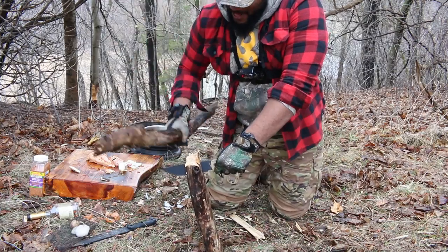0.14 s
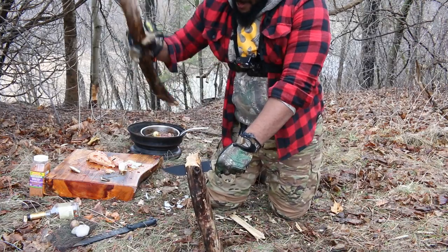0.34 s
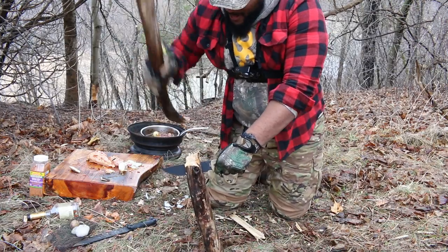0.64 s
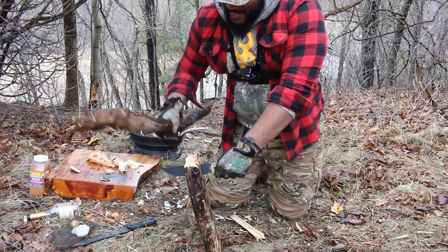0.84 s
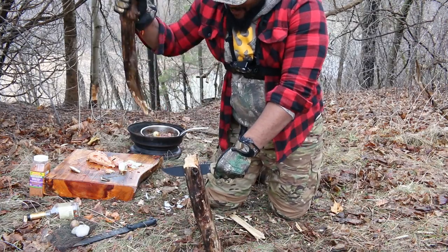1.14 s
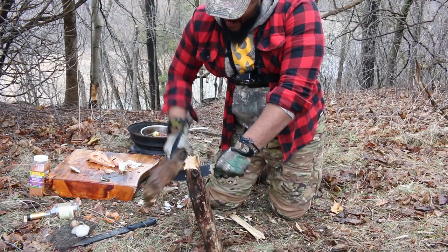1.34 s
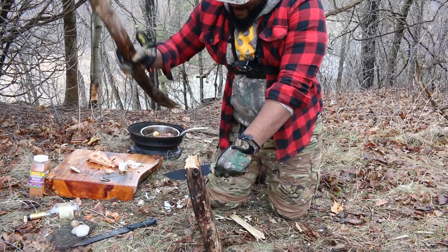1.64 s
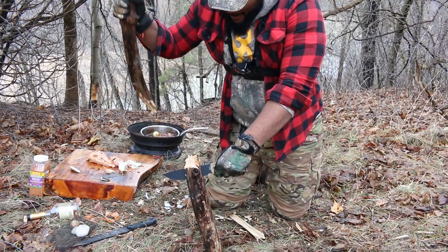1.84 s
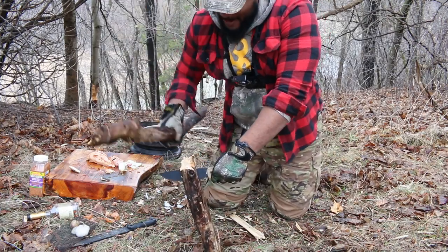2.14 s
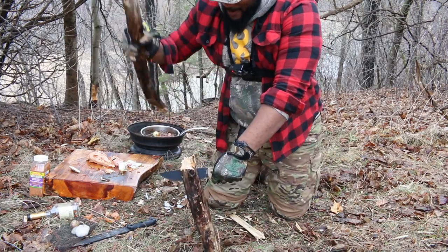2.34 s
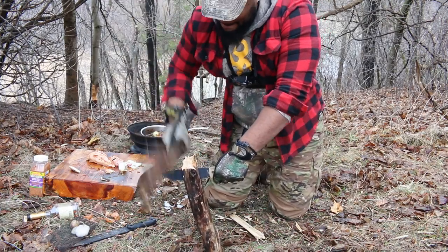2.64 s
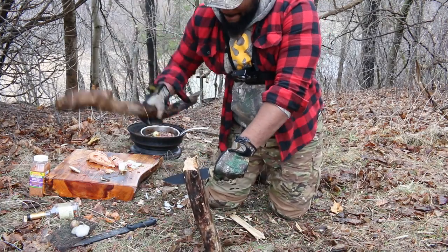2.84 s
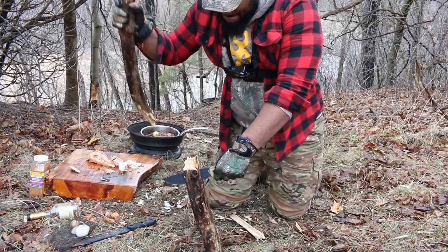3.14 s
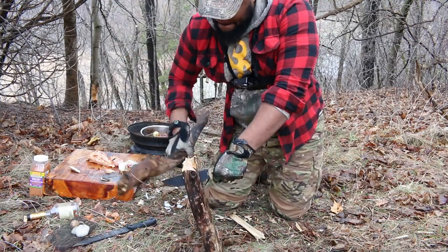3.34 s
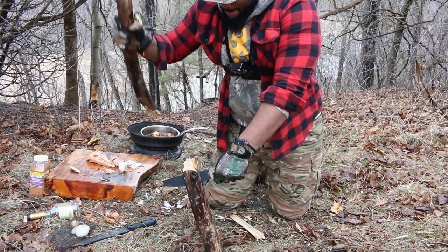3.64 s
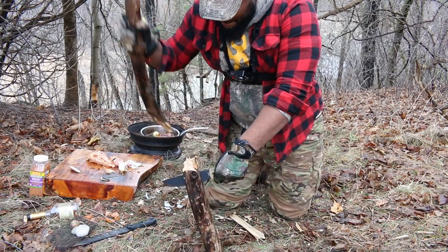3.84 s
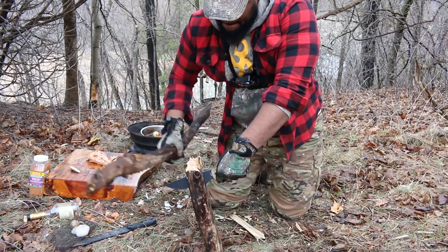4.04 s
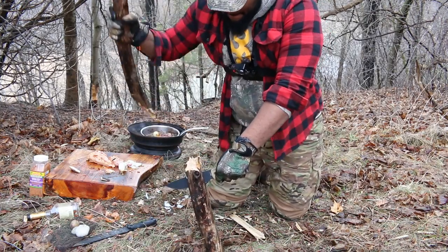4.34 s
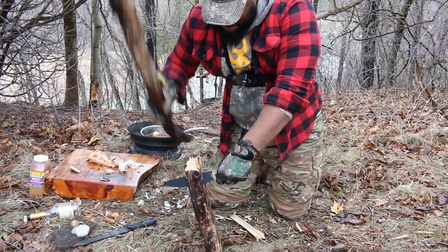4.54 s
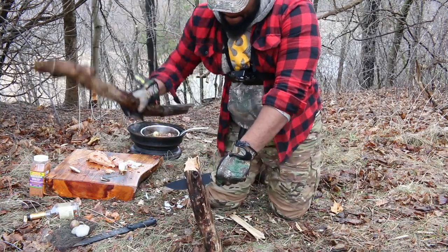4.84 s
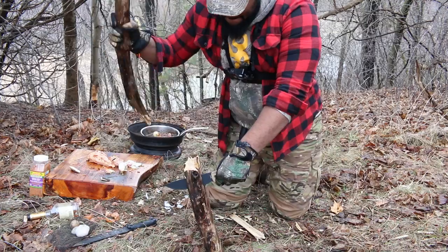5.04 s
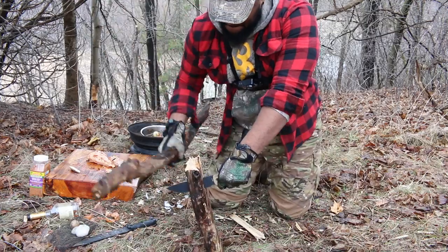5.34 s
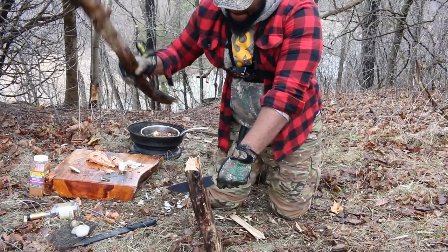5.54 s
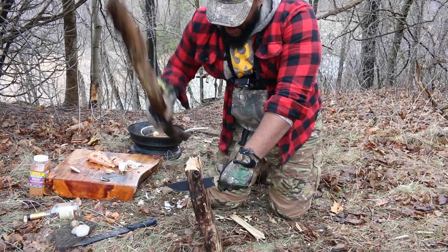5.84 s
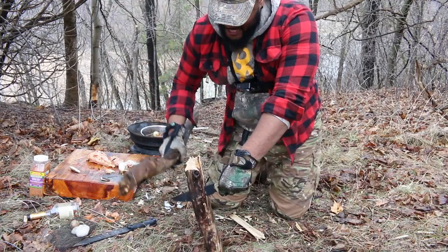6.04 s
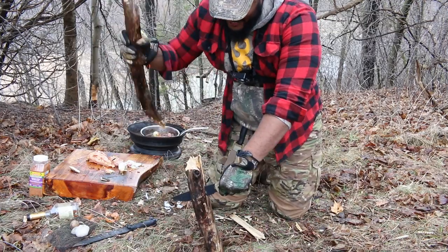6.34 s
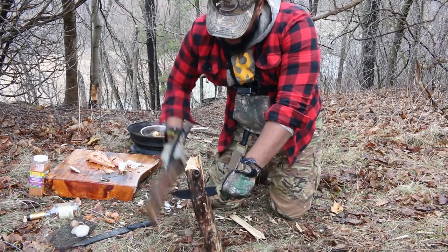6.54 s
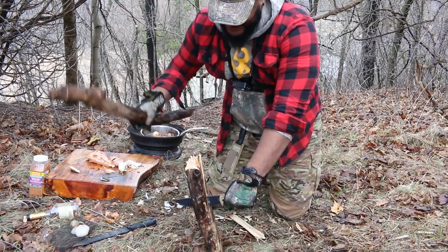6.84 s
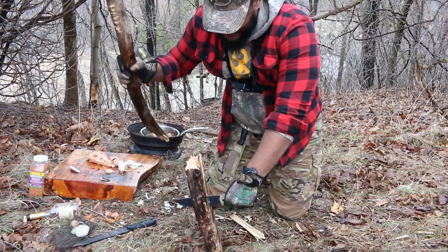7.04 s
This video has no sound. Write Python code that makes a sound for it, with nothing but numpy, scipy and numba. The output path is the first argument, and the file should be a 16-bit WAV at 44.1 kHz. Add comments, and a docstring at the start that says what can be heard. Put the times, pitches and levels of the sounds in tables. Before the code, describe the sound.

A wooden baton knocks hard and steadily on a knife splitting a log, cracking fibres later, over a roaring camp stove and spitting pan.

```python
"""In a bare wood a wooden baton drives a knife down through a log: eleven blows ring a bank of
dying modes, the last five tear fibres in noisy snaps, and trunks and ground echo them sparsely.
A camp stove roars as shaped noise under a pan of spitting fat; a faint hum wavers and light air stirs.
A camera close by clips peaks beyond full scale, and its gain control ducks the background after loud sounds."""
import sys
import numpy as np
from scipy import signal
from scipy.fft import rfft, irfft, next_fast_len
from scipy.io import wavfile
from scipy.ndimage import uniform_filter1d
from numba import njit

SR = 44100
rng = np.random.default_rng(int(sys.argv[2]) if len(sys.argv) > 2 else 0)


def ratio(d):
    """dB to gain"""
    e = np.asarray(d, float) / 20
    return 10 ** e


def master(y):
    """Save y as 16-bit WAV."""
    cut = np.clip(np.atleast_2d(y).T, -1, 1)
    pcm = np.round(cut * 32767)  # scale
    wavfile.write(sys.argv[1], SR, pcm.astype(np.int16))


N = 317079


def evened(x):
    """Scales to rms 1."""
    return x / np.sqrt(np.mean(x ** 2) + 1e-20)


def read(points, hz, column=1):
    """Reads a table column over log frequency."""
    table = np.transpose(points)
    return np.interp(np.log(hz + 1), np.log(table[0] + 1), table[column])


def add(mix, start_s, sound):
    """Mixes a sound in at its start time, cut off at the end of the mix."""
    part = mix[round(start_s * SR):][:len(sound)]
    part += sound[:len(part)]


def ring(t, hz, t60_s):
    """One mode: a sine that falls 60 dB in t60_s."""
    return ratio(-60 * t / t60_s) * np.sin(2 * np.pi * hz * t)


def burst(hz, t60_s, width):
    """A snap: noise that starts at once and dies, in a broad band round hz; peak about 1."""
    t = np.arange(4096) / SR
    noise = rng.standard_normal(len(t))
    band_hz = np.clip([hz / (1 + width), hz * (1 + width)], 100, .45 * SR)
    band = signal.butter(2, band_hz, "bandpass", fs=SR, output="sos")
    steady = signal.sosfilt(band, noise)
    dying = signal.sosfilt(band, noise * ratio(-60 * t / t60_s))
    return dying / (2 * steady.std())


def wander(size):
    """Slow random drift of rms 1, smoothed twice over size samples."""
    once = uniform_filter1d(rng.standard_normal(N), size)
    return evened(uniform_filter1d(once, size))


def ports(x, left_db):
    """A source a little to one side reaches the two microphone ports apart in level and time."""
    lag_samples = 1.86  # the right port hears it later
    size = next_fast_len(N)
    turn = np.exp(-2j * np.pi * np.fft.rfftfreq(size) * lag_samples)
    later = irfft(rfft(x, size) * turn, size)[:N]
    return np.array([x * ratio(left_db / 2), later * ratio(-left_db / 2)])


# baton blows; hardness lifts the modes near the favoured pitch, heft the lowest ones; levels are relative:
# [start_s, strength_db, hardness_db, favoured_hz, heft_db]
BLOWS = [(0.1593, 11.5, 8.5, 2140, 3), (0.8183, 9, -0.5, 2600, 2.5), (1.4580, 7.5, 7, 2800, 3.5),
         (2.1165, 7.5, 7, 3050, 3.5), (2.7662, 8, 8.5, 2900, 4), (3.4086, 9.5, -8.5, 5000, 2.8),
         (4.0626, 14, -10, 2770, 0), (4.7076, 11.5, 0.5, 4300, 1), (5.3645, 8, -1.5, 3300, 0.6),
         (6.0099, 12, -20, 2600, 1.5), (6.6694, 12, 3, 4750, 1.5)]


def blows():
    """Each baton blow sets log, baton and blade ringing afresh."""
    out = np.zeros(N)
    for start_s, *how in BLOWS:
        add(out, start_s, blow(start_s, *how))
    return out


def blow(start_s, strength_db, hardness_db, favoured_hz, heft_db):
    """A short push rings the modes and cracks; a harder contact lifts the favoured modes and the crack."""
    t = np.arange(8192) / SR
    # the log rings shorter once the split opens
    whole_factor, split_opens_s, loss_per_s = 0.94, 3.96, 0.1
    ring_factor = whole_factor - loss_per_s * max(start_s - split_opens_s, 0)
    modes = log_modes(t, hardness_db, favoured_hz, heft_db, ring_factor)
    crack = ratio(-1.0 + 0.27 * hardness_db) * np.pad(burst(3350, 0.022, 0.9), (0, len(t) - 4096))
    contact = 1 - np.exp(-t / 0.00099)  # the force builds while the wood dents
    return ratio(strength_db) * contact * (crack + modes)


# log, baton and blade ring together; levels are relative, decay times are scaled by each excitation:
# [pitch_hz, level_db, t60_s]
LOG = [(59, -33.5, 0.09), (301, -14, 0.019), (547, -10, 0.031), (756, -13, 0.038), (908.5, 0, 0.022),
       (1084.4, 5, 0.026), (1194, -8.5, 0.07), (1302, -5.5, 0.045), (1610, -7.5, 0.029),
       (1993, -9.5, 0.021), (2280, -7.5, 0.02), (2800, -2, 0.014), (3140, -14.5, 0.013), (3320, -24, 0.025),
       (4000, -7.5, 0.004), (4353, -15, 0.018), (4910, -6, 0.016), (5300, -46, 0.0061),
       (6870, -24.5, 0.0033), (7100, -50, 0.0096), (8700, -11, 0.0073)]


def log_modes(t, lift_db, favoured_hz, heft_db, ring_factor):
    """The modes as excited from one spot; neighbours swing in opposite senses."""
    hz, mode_db, t60_s = np.transpose(LOG)[:, :, None]
    chance_db, detune = rng.standard_normal((2, len(LOG), 1))
    near = np.exp(-(np.log2(hz / favoured_hz) / 0.37) ** 2)  # closeness in octaves
    octaves_from_1085 = np.minimum(np.log2(hz / 1085), 0)  # zero above 1085 Hz
    mode_db = mode_db + lift_db * near - heft_db * octaves_from_1085 + 1.6 * chance_db
    sense = (-1.) ** np.arange(len(LOG))[::-1, None]
    modes = ring(t, hz * (1 + 0.018 * detune), t60_s * ring_factor)
    return (sense * ratio(mode_db) * modes).sum(0)


# snaps of tearing fibres; levels are relative: [start_s, level_db, centre_hz]
SPLINTERS = [(4.0585, -11.5, 6000), (4.0614, 5, 7000), (4.7100, 12, 7000), (4.7125, -14, 6000),
             (5.3625, -13, 4400), (5.368, -1, 5500), (5.3709, 13, 4000), (6.014, 4, 6000),
             (6.0218, -6, 4000), (6.024, 6, 3430), (6.03, -9, 3500), (6.6738, 8, 6300), (6.676, 19.5, 4270),
             (6.6881, 13, 2600), (6.6882, 8.5, 5550)]


def splinters():
    """Fibres tear in noisy snaps as the split runs; rows that start together make one snap of two pitches."""
    out = np.zeros(N)
    for start_s, *how in SPLINTERS:
        add(out, start_s, splinter(*how))
    return out


def splinter(level_db, centre_hz):
    """A noisy snap of torn fibre that briefly rings those modes of the log that lie in its band."""
    snap = burst(centre_hz, 0.022, 1.0)
    modes = log_modes(np.arange(4096) / SR, lift_db=45, favoured_hz=centre_hz, heft_db=-3, ring_factor=0.22)
    rung = signal.fftconvolve(snap[:20], modes)[:len(snap)]
    return ratio(level_db) * (snap + 0.53 * rung / abs(rung).max())


def echoes(log):
    """Four random echo patterns take turns from blow to blow, so the tails differ."""
    blow_s = np.transpose(BLOWS)[0]
    pattern = np.searchsorted(blow_s - .1, np.arange(N) / SR) % 4
    rough = roughened(log)
    return sum(trees(rough * (pattern == k)) for k in range(4))


def roughened(x):
    """Blurs the treble peaks with random sign flips, so that the echo tails sound rough, not ringing."""
    split_hz, blur_hz = 1800, 700
    treble = signal.sosfilt(signal.butter(2, split_hz, "highpass", fs=SR, output="sos"), x)
    body = signal.sosfilt(signal.butter(2, split_hz, fs=SR, output="sos"), x)
    blur = signal.sosfilt(signal.butter(2, blur_hz, fs=SR, output="sos"), rng.standard_normal(N))
    return body + treble * np.sign(blur)


# trunks and ground scatter each blow; levels are relative: [band_hz, level_db, t60_s]
TREES = [(100, -51, .25), (400, -68, 0.1), (1234, -20.5, 0.57), (2000, -18.5, 0.31), (2900, -23, 0.43),
         (4160, -19.5, 0.35), (6000, -17.5, 0.24), (12100, -34, 0.51)]


def trees(x):
    """Sparse echoes of random sign, each band with its own level and decay."""
    taps = np.zeros((2, SR // 2))
    slots = np.arange(200, SR // 2 - 20, 20)
    at = slots + rng.integers(0, 20, (2, (SR // 2 - 201) // 20))
    np.put_along_axis(taps, at, rng.choice([-1., 1.], at.shape), 1)
    taps[1] = 0.58 * taps[0] + 0.81 * taps[1]  # the two sides are partly alike
    hz, t, z = signal.stft(taps, SR, nperseg=256)
    t60_s = read(TREES, hz, column=2)[:, None]
    fade = ratio(read(TREES, hz)[:, None] - 60 * t / t60_s) / np.sqrt(150 * t60_s)
    tail = signal.istft(z * fade, SR, nperseg=256)[1]
    return signal.fftconvolve(x[None], tail, axes=1)[:, :N]


def pan():
    """Water bursts out of hot fat: a steady fizz of tiny pops under separate spits."""
    return fizz() + spits()


# bursting bubbles; pitch varies from pop kind to pop kind, levels are relative: [pitch_hz, width_hz, level_db]
FIZZ = [(2600, 840, 3.5), (3670, 720, 6), (4810, 500, 2), (7000, 880, 5.5)]


def fizz():
    """Tiny bubbles pop at random, each a short ring whose bandwidth sets its decay."""
    t, out = np.arange(1024) / SR, np.zeros(N)
    total_db, pops_per_s = -46.5, 350
    kinds = FIZZ * 5
    for hz, width_hz, level_db in kinds:
        size = ratio(2.5 * np.minimum(rng.exponential(1, N), 4))
        pops = size * (rng.random(N) < pops_per_s / SR / len(kinds))
        pop = ratio(level_db) * ring(t, hz * rng.uniform(0.905, 1.107), 3.8 / width_hz)
        out += signal.oaconvolve(pops, pop)[:N]
    return ratio(total_db) * evened(out)


# loud spits of fat; levels are relative: [start_s, level_db, centre_hz]
SPITS = [(.58, -24, 3730), (.6887, -24, 4130), (1.036, -26, 6340), (1.2313, -20, 4570), (1.266, -27, 3670),
         (1.3278, -20, 6150), (1.3477, -22.5, 3750), (1.686, -12, 6500), (1.7804, -22, 3450),
         (1.81, -22, 2410), (2.254, -19, 3830), (2.426, -21.5, 6440), (2.7082, -26, 2790),
         (3.1509, -22.5, 4200), (4.5775, -21.5, 3400), (4.6293, -16, 1890), (4.665, -23, 1940),
         (4.8917, -20.5, 4250), (4.96, -24, 3400), (5.0019, -22, 2170), (5.0172, -19.5, 4260),
         (5.2499, -21, 7100), (5.6261, -20.5, 6850), (5.6379, -24, 4190), (5.79, -30, 6000),
         (5.8355, -23, 2170), (6.333, -21.5, 4660), (6.5713, -8, 4620), (6.7865, -18, 4970),
         (6.8224, -21.5, 6400), (7.0671, -20, 3620)]


def spits():
    """Loud spits at set times, with small ones strewn at random between them."""
    out = np.zeros(N)
    small_per_s, small_db, spread_db = 6, -38.5, 3.1
    low_hz, high_hz = 2110, 4900
    when, size, pitch = rng.random((round(small_per_s * N / SR), 3)).T
    small = np.transpose([when * N / SR,
                          small_db + spread_db * (2 * size - 1),
                          low_hz * (high_hz / low_hz) ** pitch])
    for start_s, *how in [*SPITS, *small]:
        add(out, start_s, spit(*how))
    return out


def spit(level_db, centre_hz):
    """A broad click as the bubble bursts, with a short snap at its own pitch; big spits are broader."""
    t60_s, widens_above_db = .011, -18
    width = .15 * ratio(2.55 * max(level_db - widens_above_db, 0))
    click = ratio(-0.5) * burst(centre_hz, t60_s / 4, 2.1)
    return ratio(level_db) * (burst(centre_hz, t60_s, width) + click)


# tone of the flame, relative level per Hz: [pitch_hz, level_db]
STOVE = [(15, -33), (25, -8.5), (60, -14.5), (130, -5.5), (200, -12.5), (340, -11.5), (520, -6), (700, -1),
         (900, 0.5), (1370, -5.5), (1750, -9.5), (2100, -17), (2600, -24), (3700, -21), (6000, -22.5),
         (7600, -25), (9300, -31.5), (12000, -31.5), (16000, -28.5)]
# left-right likeness, 1 is identical: [pitch_hz, likeness]
STOVE_SAME = [(30, .2), (170, .9), (400, .77), (1400, .77), (1900, .65), (3400, .8), (6000, .6),
              (10300, .75), (13000, .2)]
# left minus right level: [pitch_hz, balance_db]
STOVE_BALANCE = [(60, 7.5), (110, 1.5), (200, 2.5), (380, -1.5), (700, -3.5), (1290, -4), (2380, 1),
                 (4400, 2.5), (8120, 2.5), (15000, -2)]
# phase by which the left port leads: [pitch_hz, lead_rad]
STOVE_PHASE = [(30, -.2), (400, -.5), (1000, -.3), (1900, .1), (3400, .7), (5900, 1.8), (7600, 1.7),
               (10300, 3.0), (16000, 4.0)]


def stove():
    """Turbulent flame roar and hiss: random spectra with drifting patches and a quick flutter."""
    frames, hz = N // 256 + 5, np.fft.rfftfreq(1024, 1 / SR)
    a, b, c, d, patches = rng.standard_normal((frames, 513, 5)).T
    patches = uniform_filter1d(patches, size=10, axis=0)
    patches = evened(uniform_filter1d(patches, size=10, axis=1))
    flutter = evened(uniform_filter1d(rng.standard_normal(frames), size=4))
    same = np.clip(read(STOVE_SAME, hz), -1, 1)[:, None]
    lead = np.exp(1j * read(STOVE_PHASE, hz))[:, None]
    right = a + 1j * b
    left = same * right * lead + np.sqrt(1 - same ** 2) * (c + 1j * d)
    lean = ratio(read(STOVE_BALANCE, hz) / 2)[:, None]
    tone_db = read(STOVE, hz)[:, None] + 1.77 * patches + 0.14 * flutter
    z = np.array([left * lean, right / lean]) * ratio(tone_db)
    roar = evened(signal.istft(z, nperseg=1024, noverlap=768)[1][:, :N])
    return roar * ratio(-33.5 + 0.42 * wander(size=8000))  # level and slow drift in dB


# the flame coughs; levels are relative: [start_s, level_db, centre_hz]
COUGHS = [(1.015, -16.5, 650), (1.11, -19, 810), (1.13, -13.5, 613), (2.964, -29, 335), (3.148, -25, 384)]


def coughs():
    """Short dull swells of the flame: narrow noise that builds softly and dies, a little to the right."""
    out, rise = np.zeros(N), 1 - np.exp(-np.arange(4096) / SR / 0.013)
    for start_s, level_db, centre_hz in COUGHS:
        add(out, start_s, ratio(level_db) * rise * burst(centre_hz, 0.058, 0.12))
    return out * ratio([[-1.5], [1.5]])


# course of the hum before its waver: [time_s, level_db]
HUM = [(0, -78), (2.5, -57), (3.2, -49), (4.5, -51), (7.2, -53)]


def hum():
    """A low tone whose pitch and level waver a little."""
    waver = evened(uniform_filter1d(rng.standard_normal((2, N)), size=6000, axis=1))
    pitch_hz = 132 + 1.58 * waver[0]
    tone = np.sin(2 * np.pi * np.cumsum(pitch_hz) / SR)
    level_db = np.interp(np.arange(N) / SR, *np.transpose(HUM)) + 4.0 * waver[1]
    return tone * ratio(level_db)


def wind():
    """Low lumpy noise, unrelated at the two ports, swelling into a low rumble after each blow."""
    top_hz, level_db, lumps_db = 70, -61, 5
    low_pass = signal.butter(2, top_hz, fs=SR, output="sos")
    air = signal.sosfilt(low_pass, rng.standard_normal((2, N)))
    return evened(air) * (ratio(level_db + lumps_db * wander(size=6000)) + rumble_lift())


def rumble_lift():
    """A low rumble that swells briefly after each blow, stronger after heavier blows."""
    level_db, db_per_heft_db, peak_s, slope_db_per_s = -43, 2.5, 0.07, 110
    t = np.arange(N) / SR
    start_s, heft_db = np.transpose(BLOWS)[[0, -1], :, None]
    away_s = abs(t - start_s - peak_s)
    lift = ratio(level_db + db_per_heft_db * heft_db - slope_db_per_s * away_s)
    return (lift * (t > start_s)).sum(0)


def scene():
    """Blows and splinters with their echoes, over pan, stove, hum and wind."""
    log = blows() + splinters()
    wood = ports(log, left_db=2.7) + echoes(log)
    cooking = ports(pan(), left_db=1.0) + stove() + coughs()
    return wood + cooking + hum() + wind()


@njit
def duck(level_db, limit_db, fall, hold, rise, steepest_db):
    """Gain in dB: falls fast toward the excess over the limit, waits, then climbs back and eases in."""
    gain_db, now, wait = np.zeros(len(level_db)), 0., 0.
    for i in range(len(level_db)):
        want = min(limit_db - level_db[i], 0.)
        if want < now:
            now += fall * (want - now)
            wait = hold
        elif wait > 0:
            wait -= 1
        else:
            now += min(rise * (want - now), steepest_db)
        gain_db[i] = now
    return gain_db


def band_limit(x):
    """A steep low-pass at the top of the band."""
    return signal.sosfilt(signal.butter(12, 16490, fs=SR, output="sos"), x)


def record(dry):
    """Low cut, gain control that lags behind each blow so that its start can clip, then treble roll-off."""
    low_cut_hz, roll_off_hz = 30, 12000
    heard = signal.sosfilt(signal.butter(1, low_cut_hz, "highpass", fs=SR, output="sos"), dry)
    power = uniform_filter1d((heard ** 2).mean(0), size=45)
    level_db = 10 * np.log10(abs(power) + 1e-12)
    limit_db, fall_s, hold_s, rise_s, climb_db_per_s = -13.0, 0.0034, 0.069, 0.05, 156
    gain_db = duck(level_db, limit_db, 1 / (fall_s * SR), hold_s * SR, 1 / (rise_s * SR), climb_db_per_s / SR)
    clipped = np.clip(heard * ratio(gain_db), -1, 1)
    soft = signal.sosfilt(signal.butter(2, roll_off_hz, fs=SR, output="sos"), clipped)
    headroom = .91
    return band_limit(headroom * soft)


dry = scene()
out = record(dry)
master(out)
```